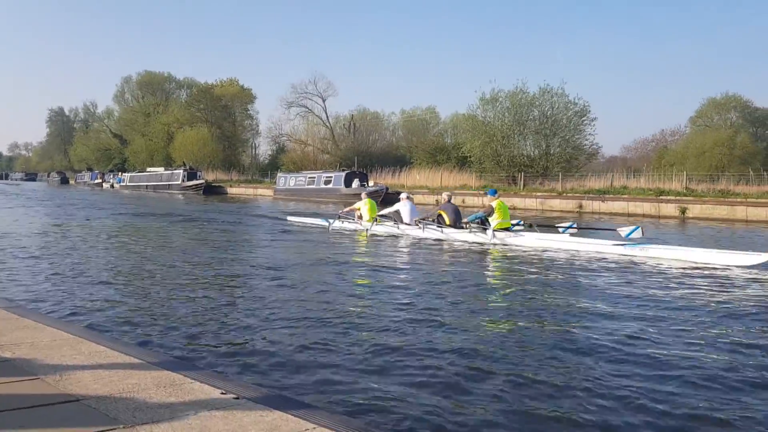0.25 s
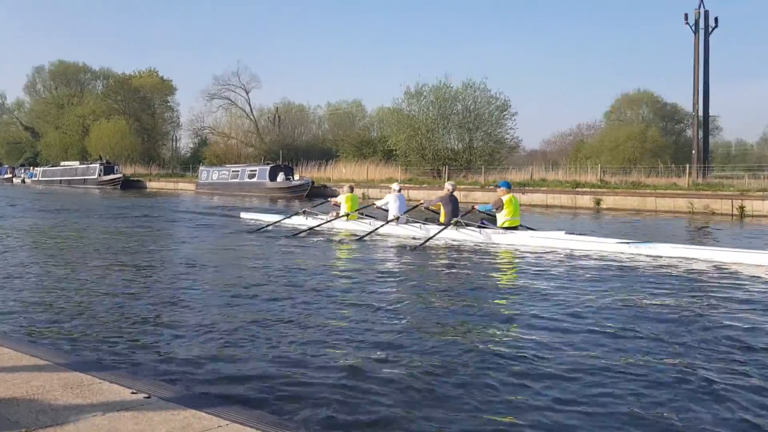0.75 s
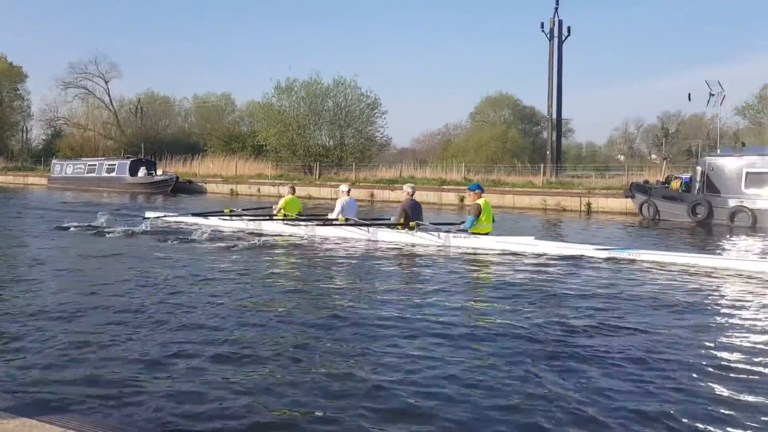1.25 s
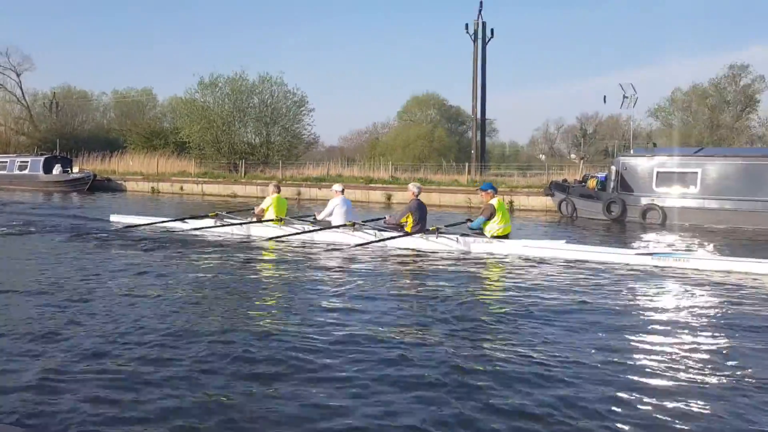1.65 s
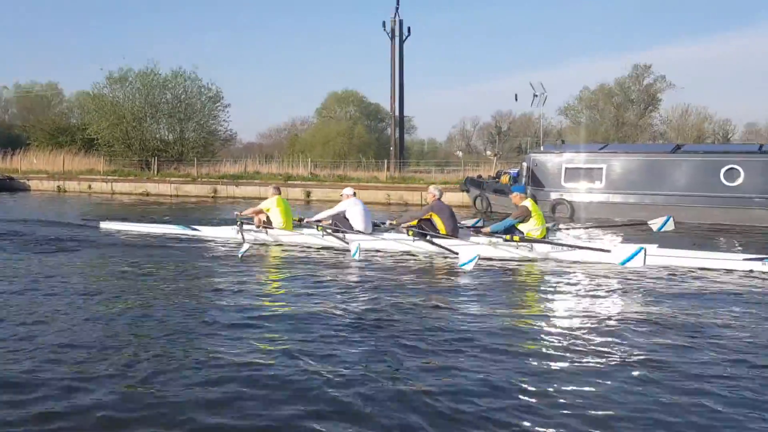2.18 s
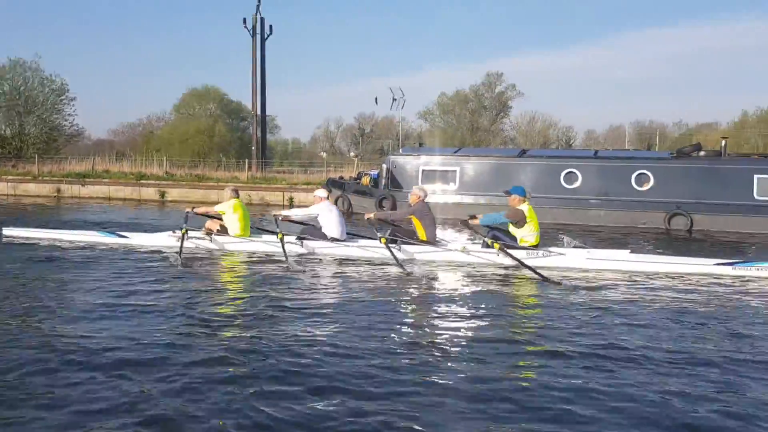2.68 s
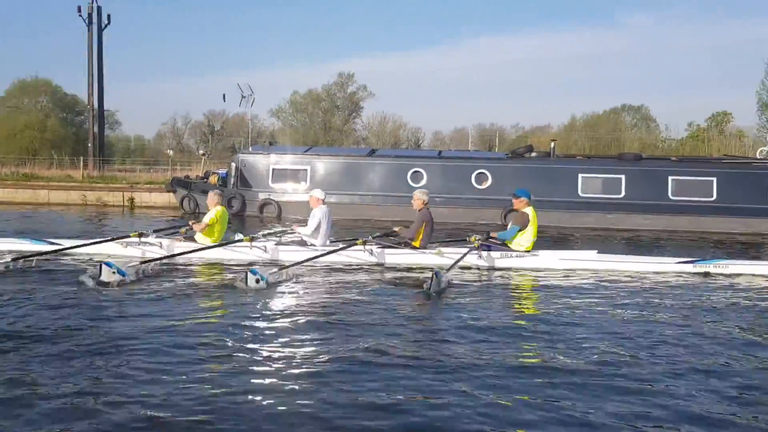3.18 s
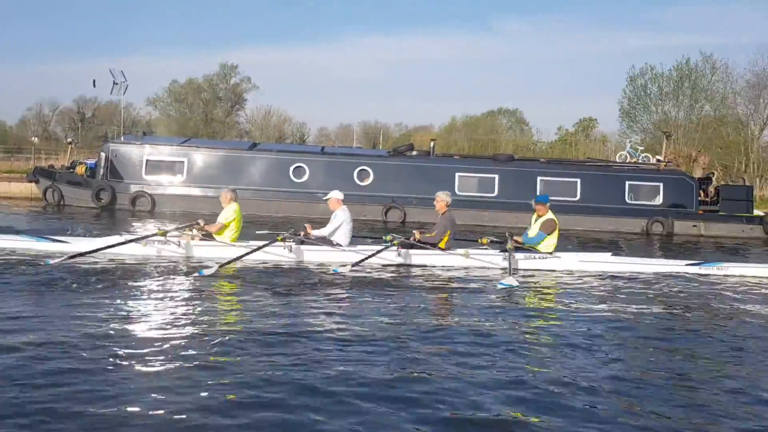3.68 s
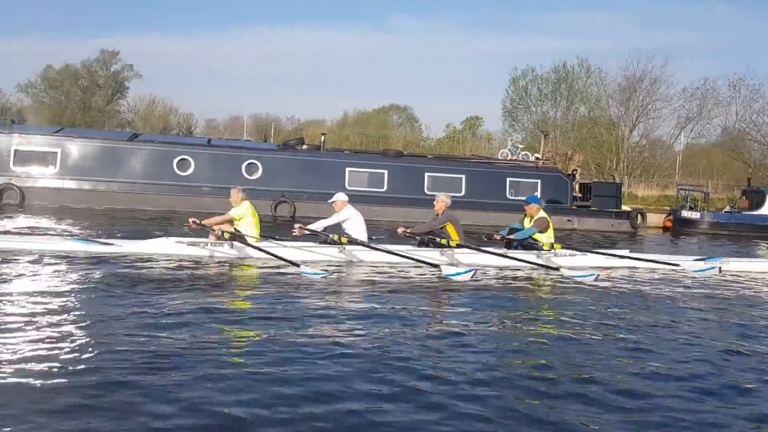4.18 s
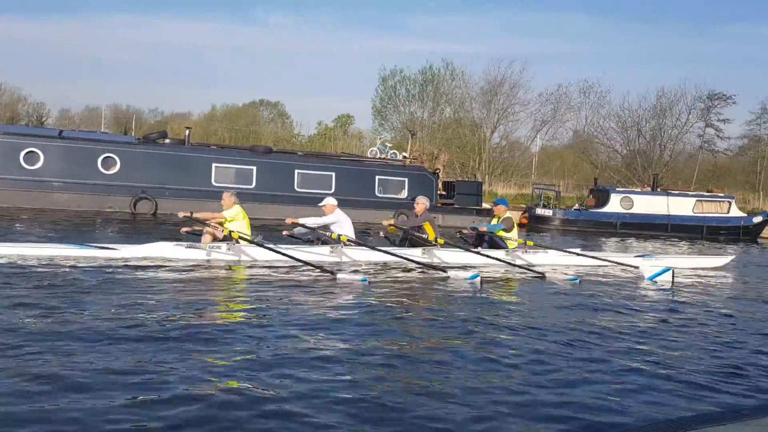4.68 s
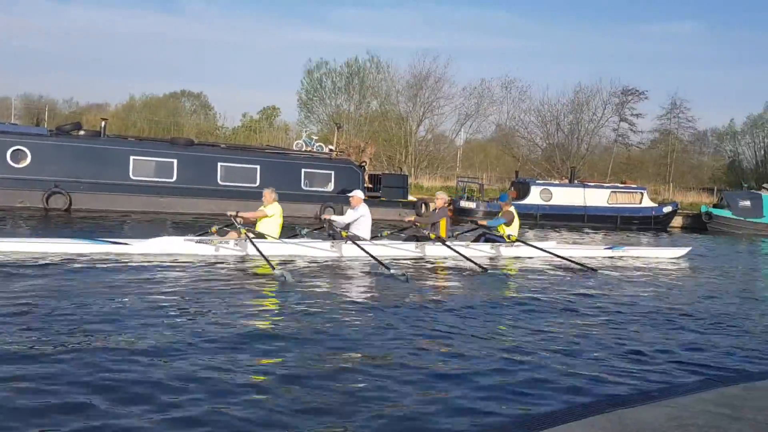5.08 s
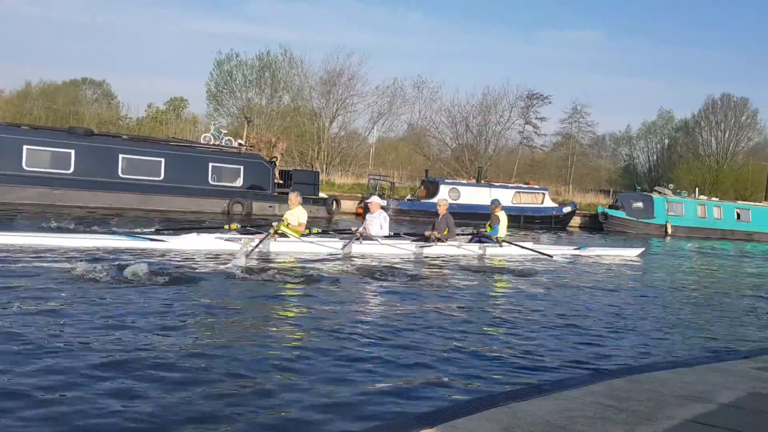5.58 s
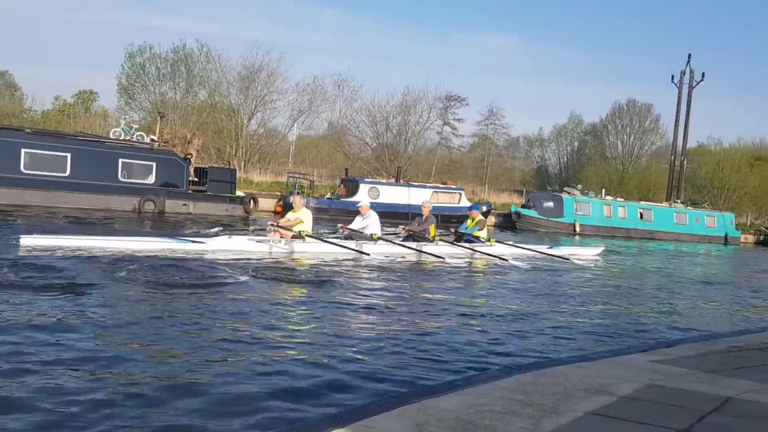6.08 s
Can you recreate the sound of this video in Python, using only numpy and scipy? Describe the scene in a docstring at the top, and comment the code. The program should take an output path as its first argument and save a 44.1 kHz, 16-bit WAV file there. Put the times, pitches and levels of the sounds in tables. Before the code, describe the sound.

Open river bank, soft ripples and rustle, with low breeze buffets on the microphone, strongest around 2.5-3.5 s. A small bird gives thin, high sliding notes from 0 to 2 s, while another whistles faintly far off in the first second. Oars knock lightly at 0.2 s; blades enter with a bubbly splash near 0.45 s, water churns, and a hollow volley of knocks marks the finish around 1.2 s. Wash and ticking drips follow as seats roll forward, with more knocks at 2.3 s. The second catch splashes crisply at 2.55 s, closest and brightest; its finish clunks hard at 3.36 s with a sharp spatter at 3.46 s. Drips and soft knocks lead to the third catch at 4.7 s, then firm knocks and a bright splash at 5.46 s and a swelling wash. Faint chirps return from 5.1 s; last clacks come around 5.9-6.1 s as seats roll again.

```python
"""A four rows past close to a river bank, about one stroke every two seconds, under a breeze and faint ripples and rustle.
Before each stroke the seats roll forward (filtered noise) and oars are squared in volleys of knocks (damped modes).
At the catch the blades drop in with bubbles and spray, then drive, come out at the finish and are feathered with knocks;
a wash (swelling noise) and ticking drips follow. The finest treble is strongest at 2.8 s.
A small bird sings in the trees at the start and near the end, and another whistles far off early on (gliding sines)."""
import sys
import numpy as np
from scipy import signal
from scipy.fft import rfft, irfft, next_fast_len
from scipy.io import wavfile
from scipy.ndimage import uniform_filter1d, map_coordinates

SR = 44100
rng = np.random.default_rng(int(sys.argv[2]) if len(sys.argv) > 2 else 0)


def digitize_waveform(pressure):
    """Quantize a signal to 16-bit integers and store it at the path in sys.argv[1].

    Rows of a 2-D input are taken as channels; values are limited to [-1, 1].
    """
    field = np.atleast_2d(pressure).T
    bounded = np.clip(field, -1, 1)
    quanta = np.round(bounded * 32767).astype(np.int16)
    wavfile.write(sys.argv[1], SR, quanta)


N = 279974
TIME = np.arange(N) / SR  # seconds


def amp(db):
    """Decibel law: a level in dB becomes an amplitude gain."""
    return 10 ** (np.asarray(db) / 20)


def unit(x):
    """Power normalisation: scales a signal to rms 1."""
    return x / np.sqrt(np.mean(x ** 2) + 1e-20)


def curves(rows):
    """Linear interpolation: each column of a time table, sample by sample."""
    s, *columns = np.transpose(rows)
    return [np.interp(TIME, s, column) for column in columns]


def read(points, hz):
    """Logarithmic frequency scale: reads a table between its points as the ear spaces pitch."""
    f, value = np.transpose(points)
    return np.interp(np.log(hz + 1), np.log(f + 1), value)


def add(mix, s, sound):
    """Superposition: mixes a sound in at time s, cut off at the end of the mix."""
    part = mix[..., max(round(s * SR), 0):][..., :sound.shape[-1]]
    part += sound[..., :part.shape[-1]]


def colour(x, spectrum):
    """Spectral shaping: multiplies the spectrum of x by a table of gains, then scales to rms 1."""
    size = next_fast_len(x.shape[-1])
    gain = amp(read(spectrum, np.fft.rfftfreq(size, 1 / SR)))
    shaped = irfft(rfft(x, size) * gain, size)
    return unit(shaped[..., :x.shape[-1]])


# Likeness of a diffuse sound at two close ears. Each row: frequency in Hz, correlation from 0 to 1.
LIKENESS = [(60, 1), (250, 0.84), (600, 0.93), (1200, 0.3), (2500, 0.02), (6000, 0.012), (15000, 0.11)]


def pair(x):
    """Spatial coherence: makes two unrelated signals alike in the bass, as two close ears hear them."""
    size = next_fast_len(N)
    a, b = rfft(x, size)
    same = np.clip(read(LIKENESS, np.fft.rfftfreq(size, 1 / SR)), -1, 1)
    right = same * a + np.sqrt(1 - same ** 2) * b
    return irfft(np.array([a, right]), size)[:, :N]


def wander(per_s):
    """Slow random modulation: joins per_s chance values a second by straight lines, at rms 1."""
    return unit(np.interp(TIME * per_s, np.arange(4000), rng.standard_normal(4000)))


def hiss():
    """White noise: two unrelated signals with equal power at all frequencies."""
    return rng.standard_normal((2, N))


def gurgle(x, depth_db):
    """Time-frequency modulation: small patches of pitch grow louder and softer at random, an uneven texture."""
    z = signal.stft(x, nperseg=512)[2]
    patches = rng.standard_normal(z.shape[1:])
    patches = uniform_filter1d(patches, size=5, axis=0)  # across frequency
    patches = uniform_filter1d(patches, size=4, axis=1)  # across time
    return unit(signal.istft(z * amp(depth_db * unit(patches)), nperseg=512)[1][:, :N])


def swell(peak_s, rise_s, fall_s, edge=1):
    """Exponential envelope: grows to 1 at the peak and dies away; a higher edge flattens the top."""
    distance = np.maximum((peak_s - TIME) / rise_s, (TIME - peak_s) / fall_s)
    return np.exp(-distance ** edge)


def together(gains):
    """Energy addition: the joint gain of unrelated sounds is the root of their summed squares."""
    return np.sqrt(np.sum(np.square(gains), axis=0))


def ring(modes, t, detune=0):
    """Modal decay: damped sines after one blow, each at a chance phase and with chance detuning."""
    out = 0
    for hz, db, t60 in modes:
        mode_hz = hz * (1 + detune * rng.standard_normal())
        out = out + amp(db - 60 * t / t60) * np.sin(2 * np.pi * mode_hz * t + rng.random())
    return out


# Ripples and rustle all around. Each row: frequency in Hz, relative level in dB per Hz.
AIR = [(18, -42), (30, -23), (121, -9), (364, -3.5), (540, -3.5), (760, -24), (1130, -30), (1320, -19),
       (2060, -11), (3400, -19), (6380, -21.5), (9710, -25.5), (13000, -22), (16000, -27)]


def air():
    """Diffuse background: coloured noise of equal power on both sides, flickering in small patches of pitch."""
    return amp(-50.5) * colour(gurgle(pair(hiss()), depth_db=4.5), AIR)


# Spectrum of the wind turbulence. Each row: frequency in Hz, relative level in dB per Hz.
WIND = [(15, -45), (35, -16), (62, -3), (85, -7), (125, -6), (180, -15), (300, -22), (700, -41),
        (3000, -62)]
# Strength of the breeze. Each row: time in seconds, relative level in dB, left minus right in dB.
BREEZE = [(0.0, -54.5, -27), (0.45, -35.5, 10), (1.35, -37.5, -0.5), (2.1, -41.5, 2), (2.48, -35, 3),
          (2.62, -26.5, 1.5), (2.85, -46.5, 30.5), (3.43, -22.5, -3.5), (3.66, -50, 28.5), (3.87, -38.5, 8),
          (4.3, -34.5, 4), (4.8, -48, 12), (5.3, -56, 24), (5.55, -35.5, 1), (6.35, -54, 24)]
# Single buffets of wind. Each row: start in seconds, relative level in dB, frequency in Hz.
BUFFETS = [(0.353, -22.5, 67), (2.545, -19, 176), (2.677, -24, 101), (3.091, -21.5, 87), (3.374, -16, 133),
           (3.419, -30, 68), (3.817, -21, 83.7), (3.854, -24, 48.1), (3.881, -22, 56.6), (3.921, -25, 70.4),
           (4.149, -17.5, 125), (4.305, -19, 64.7), (5.598, -28, 107)]


def breeze(level_db=-2, lump_db=2.5, buffet_db=-4, buffet_s=0.0058):
    """Turbulent pressure on the microphone: lumpy low noise, partly unrelated at each port, and single buffets."""
    level, side = curves(BREEZE)
    lumps = amp(lump_db * np.array([wander(25), wander(25)]))
    eddies = colour(hiss() + 1.06 * rng.standard_normal(N), WIND) * lumps
    out = unit(eddies) * amp(level + level_db + np.array([side, -side]) / 2)
    t = TIME[:SR // 10]
    for s, db, hz in BUFFETS:
        push = t / buffet_s * np.exp(1 - t / buffet_s) * np.sin(2 * np.pi * hz * t)
        add(out, s, amp(db + buffet_db) * push * np.array([[1.15], [.8]]))  # stronger on the left
    return out


# Shapes of the birds' notes. Each row: time into the note in seconds, pitch in Hz before waver,
# relative level in dB.
SLUR = [(0, 6780, -5), (.012, 6620, -2), (.04, 6200, -3), (.072, 6030, 0), (.098, 5830, -1),
        (.116, 5330, -10)]
ARCH = [(0, 6500, -9), (.01, 7450, -3), (.024, 7920, -2), (.046, 7980, -1), (.068, 7680, 0),
        (.085, 7100, -6)]
FLICK = [(0, 6700, -14), (.02, 6520, -6), (.04, 6180, 0), (.052, 5950, -10)]
WHISTLE = [(0, 2400, -12), (.015, 2440, -1), (.045, 2420, 0), (.065, 2280, -2), (.085, 2170, -9)]
LOW_SLUR = [(0, 6600, -20), (.022, 6300, -13), (.042, 6110, -3), (.066, 6000, 1), (.086, 5910, 1),
            (.1, 5700, -4), (.117, 5220, -15)]
LOW_WHISTLE = [(0, 2200, -7), (.02, 2280, 0), (.045, 2330, 0), (.06, 2300, -8)]
RISE = [(0, 4550, -8), (.025, 4900, 0), (.05, 5300, -8)]
LOW_CALL = [(0, 2050, -8), (.02, 2200, 0), (.045, 2430, -6)]
HIGH_CALL = [(0, 2300, -6), (.02, 2520, 0), (.05, 2880, -6)]
HELD_WHISTLE = [(0, 2100, -8), (.015, 2100, 0), (.06, 2090, -1), (.13, 2180, -7)]
# Bird notes. Each row: start in seconds, relative level in dB, fade over the note in dB, shape.
NOTES = [(0.043, -37, 23, SLUR), (0.24, -45.5, 9, SLUR), (0.447, -39, 3, ARCH), (0.636, -50, -7, ARCH),
         (1.153, -42.5, -6, FLICK), (1.307, -35, -2, LOW_SLUR), (1.497, -35.5, -4, LOW_SLUR),
         (1.711, -46.5, -1, ARCH), (1.895, -42.5, 7, ARCH), (5.092, -50.5, 10, SLUR),
         (5.293, -49.5, -13, ARCH), (5.476, -55, -13, ARCH), (5.955, -40, 12, FLICK),
         (6.098, -47.5, -5, SLUR), (6.292, -56.5, -12, SLUR), (.04, -52, 2, LOW_WHISTLE),
         (0.392, -49, -8, WHISTLE), (.698, -43.5, 12, HELD_WHISTLE), (.8, -48, 2, RISE),
         (.91, -48, -1, RISE), (0.0, -54, 7, HIGH_CALL), (.335, -52, 0, HIGH_CALL),
         (.505, -52, 2, HIGH_CALL), (.795, -41, 7, LOW_CALL)]


def birds(level_db=-2, twinkle_db=3.5, waver=0.0046, echo_s=.107, echo_db=-21):
    """Frequency modulation: thin sines glide through each note's shape, with an echo from the far bank."""
    song, tremble = np.zeros(N), 1 + waver * wander(460)
    for s, db, fade_db, shape in NOTES:
        age, hz, level = np.transpose(shape)
        t = np.arange(0, age[-1], 1 / SR)
        pitch = np.interp(t, age, hz) * np.roll(tremble, -round(s * SR))[:len(t)]
        gain = amp(db + level_db + np.interp(t, age, level) - fade_db * t / age[-1])
        gain = gain * signal.windows.tukey(len(t), .1)  # soft ends
        add(song, s, gain * np.sin(2 * np.pi * np.cumsum(pitch) / SR))
    add(song, echo_s, amp(echo_db) * song)
    return song * amp(twinkle_db * np.array([wander(45), wander(38)]))  # moving air makes the level twinkle


def banks(x, t60=0.3, first_s=0.011):
    """Reverberation: sparse decaying reflections from moored boats and the banks, by convolution."""
    t = TIME[:SR // 2]
    sparse = rng.random((2, len(t))) < .05
    taps = rng.standard_normal((2, len(t))) * sparse * amp(-60 * t / t60) * (t > first_s)
    return pair(signal.fftconvolve(x, taps / np.linalg.norm(taps[0]), axes=1)[:, :N])


# Strokes. Each row: catch in seconds, finish in seconds, churn of the catch in dB, of the drive in dB,
# of the wash in dB, time to settle in seconds, spray over churn in dB, relative level of the seats in dB.
STROKES = [(0.454, 1.198, -43.5, -40, -42.5, 0.5, -5.5, -39),
           (2.547, 3.389, -42, -33.5, -44, 0.29, -7.5, -40), (4.686, 5.503, -43, -43, -38.5, 0.35, -9, -39)]
STROKE_S = 2.215  # from the last catch to the next
SLIDE_EDGE = 1.76  # how squarely the slide starts and stops


def sliding(lead_s=0.44, rise_s=0.41, fall_s=0.2):
    """Periodic motion: the crew's slide is fastest shortly before each catch, the next one included."""
    catches = [stroke[0] for stroke in STROKES]
    catches.append(catches[-1] + STROKE_S)
    return together([swell(s - lead_s, rise_s, fall_s, SLIDE_EDGE) for s in catches])


def sweep(x, share=1, linger_s=0.429, swing_s=0.34):
    """Interaural time difference: sound from astern reaches the right ear later; share scales the delay."""
    ahead_ms, astern_ms = 0.012, 0.25  # lead of the left ear at share 1
    path = []
    for catch_s, finish_s, *_ in STROKES:
        path += [(catch_s, ahead_ms), (finish_s, astern_ms)]
        path += [(finish_s + linger_s, astern_ms), (finish_s + linger_s + swing_s, ahead_ms)]
    lead_ms, = curves(path)
    late = np.arange(N) - share * lead_ms * SR / 1000
    return np.array([x[0], map_coordinates(x[1], [late], order=3)])


def passing(x, nearest_s=2.8, near_for_s=0.22, above_hz=9500):
    """Distance cue: the finest treble is strongest while the boat is nearest."""
    high_pass = signal.butter(2, above_hz, "high", fs=SR, output="sos")
    return x + swell(nearest_s, near_for_s, near_for_s) * signal.sosfiltfilt(high_pass, x)


def rolling():
    """Energy envelope of the seats: slide, push-off after the catch, roll back, stop at the finish and settle."""
    slide_db, drive_db, drive_edge, stop_db = -44, -43, 4, 2.0
    push_lag_s, push_rise_s, push_fall_s = 0.1, 0.15, 0.14
    stop_rise_s, stop_share = 0.1, 0.73  # share of the settling time
    gains = [amp(slide_db) * sliding()]
    for catch_s, finish_s, *_, settle_s, _, seat_db in STROKES:
        half_s = (finish_s - catch_s) / 2
        gains.append(amp(seat_db) * swell(catch_s + push_lag_s, push_rise_s, push_fall_s))
        gains.append(amp(drive_db) * swell(catch_s + half_s, half_s, half_s, drive_edge))
        gains.append(amp(seat_db + stop_db) * swell(finish_s, stop_rise_s, stop_share * settle_s))
    return together(gains)


# Hum of the wheels on each slide towards the catch. Each row: time of the peak in seconds, level in dB.
SLIDES = [(0.0, -47), (2.1, -36.5), (4.13, -41.5), (6.33, -41.5)]
# Seat rumble through the hull. Each row: frequency in Hz, relative level in dB per Hz.
ROLL = [(70, -6), (130, -8), (200, -1.5), (290, 4), (380, -6), (470, 7), (540, 5), (620, 1), (790, -9.5),
        (1500, -30), (4000, -70)]
# Seat wheels on their rails. Each row: frequency in Hz, relative level in dB per Hz.
WHEELS = [(100, -16), (300, -8), (400, -10), (500, -3.5), (610, -1), (760, -17), (1500, -20), (4000, -69)]


def seats(judder_db=2.0, hum_rise_s=0.19, hum_fall_s=0.2):
    """Rolling noise: seat wheels hum and judder along the slides and rumble through the hull."""
    hum = together([amp(db) * swell(s, hum_rise_s, hum_fall_s, SLIDE_EDGE) for s, db in SLIDES])
    rumble = rolling() * colour(pair(hiss()), ROLL)
    return amp(judder_db * wander(40)) * (rumble + hum * colour(pair(hiss()), WHEELS))


def bubbles(low_hz, high_hz, per_s, cycles, spread_db, count=20):
    """Bubble resonance: sparse short pings, rising in pitch, of very uneven size, in a different phase at each ear."""
    out = np.zeros((2, N))
    for hz in np.geomspace(low_hz, high_hz, count):
        age = np.arange(int(6 * cycles * SR / hz)) * hz / SR / cycles  # in decay times
        phase = rng.normal(0, 1.0, (2, 1))
        envelope = np.exp(-age) * (1 - np.exp(-8 * age))
        ping = envelope * np.sin(2 * np.pi * cycles * age * (1 + 0.011 * age) + phase) * np.sqrt(hz)
        where = rng.integers(0, N, round(per_s / count * N / SR))
        size = amp(spread_db * np.minimum(rng.exponential(1, len(where)), 3.5))
        places = (where[:, None] + np.arange(len(age))).ravel()
        out += [np.bincount(places, np.outer(size, p).ravel(), minlength=N)[:N] for p in ping]
    return unit(out)


def stirring():
    """Energy envelopes of churn and spray: the hull runs, then the blades catch, drive and leave their wash."""
    run_db, run_spray_db, drive_spray_db, wash_spray_db = -47.0, -56, -4.5, 3
    catch_lag_s, catch_rise_s, catch_fall_s = 0.062, 0.095, 0.68
    drive_lead_s, drive_rise_s, drive_fall_s = 0.13, 0.18, 0.15  # lead before the finish
    wash_lag_s, wash_rise_s = 0.13, 0.24  # lag behind the finish
    run = sliding()
    churn, spray = [amp(run_db) * run], [amp(run_spray_db) * run]
    for catch_s, finish_s, catch_db, drive_db, wash_db, settle_s, spray_db, _ in STROKES:
        catch = amp(catch_db) * swell(catch_s + catch_lag_s, catch_rise_s, catch_fall_s)
        drive = amp(drive_db) * swell(finish_s - drive_lead_s, drive_rise_s, drive_fall_s)
        wash = amp(wash_db) * swell(finish_s + wash_lag_s, wash_rise_s, settle_s)
        churn += [catch, drive, wash]
        thrown = together([catch, amp(drive_spray_db) * drive, amp(wash_spray_db) * wash])
        spray.append(amp(spray_db) * thrown)
    return together(churn), together(spray)


# Blades slapping into and out of the water. Each row: start in seconds, relative level of the spray in dB,
# relative level of the slap in dB, decay in seconds.
SPLASHES = [(0.441, -45, -41, 0.049), (0.568, -28.5, -34, 0.015), (0.959, -39, -37.5, 0.078),
            (2.546, -29.5, -32.5, 0.023), (2.57, -25, -28.5, 0.01), (2.611, -59, -39, 0.0087),
            (2.669, -52, -32, 0.0093), (3.462, -19, -46, 0.01), (3.505, -33, -37, 0.026),
            (4.689, -29.5, -33.5, 0.021), (4.781, -34, -38, 0.021), (4.839, -41, -38, 0.013),
            (5.13, -80, -42, 0.095), (5.451, -27, -36.5, 0.023), (5.604, -47, -37, 0.014),
            (5.63, -40, -70, 0.056), (5.677, -33, -36, 0.013)]
# Churned water. Each row: frequency in Hz, relative level in dB per Hz.
CHURN = [(300, -12), (600, 4.5), (800, -3.5), (1050, 3.5), (1350, -1.5), (1700, 0.5), (2200, 2),
         (2400, -14), (3300, -13), (4100, -17), (6000, -8.5), (14000, -49)]
# Spray and drops. Each row: frequency in Hz, relative level in dB per Hz.
SPRAY = [(1200, -14), (2400, 4), (3300, 1.5), (4100, 6), (5200, -1), (6700, 5.5), (8500, 0), (10200, -1.5),
         (12500, 2), (14500, -5.5), (16000, -7)]


def water(crackle_db=-4, lap_db=1.74, burst_db=-8, rise_s=0.004, plink_db=-13):
    """Entrained air: blades churn up bubbles and throw spray; entries and exits add sudden bursts of both."""
    churning, spraying = stirring()
    churn_gain = churning * amp(lap_db * wander(60))
    spray_gain = spraying * amp(lap_db * wander(90))
    t = TIME[:SR // 4]
    for s, high_db, low_db, decay_s in SPLASHES:
        burst = (1 - np.exp(-t / rise_s)) * np.exp(-t / max(decay_s, .002))
        add(churn_gain, s, amp(low_db) * burst)
        add(spray_gain, s, amp(high_db + burst_db) * burst)
    churn = unit(pair(hiss())) + amp(-2) * bubbles(600, 3500, 2000, 3.5, 3.2)
    drops = amp(-3) * bubbles(2500, 14500, 1600, 7, 3.5)
    crackle = amp(crackle_db) * bubbles(5100, 17000, 350, 0.11, 3.6, count=10)  # drops bursting on the surface
    spray = unit(pair(hiss())) + drops + crackle
    churn, spray = gurgle(churn, depth_db=2.3), gurgle(spray, depth_db=3)
    plinks = amp(plink_db) * bubbles(2370, 5110, 450, 13, 1.17, count=24)  # larger drops trapping air
    return (colour(churn, CHURN) + plinks) * churn_gain + colour(spray, SPRAY) * spray_gain


# Flung water landing as clusters of drops. Each row: start in seconds, length in seconds,
# relative level of the first drops in dB, fade over the cluster in dB.
SPATTERS = [(0.567, .016, -31, 6), (2.073, 0.052, -39, 1), (2.566, .03, -28.5, 11), (1.021, 0.17, -39, 0),
            (3.13, .12, -43, 5.5), (3.4625, .004, -15.5, 2), (3.471, .016, -31, 5), (3.507, 0.016, -23, 4),
            (3.531, .045, -33.5, 5), (4.221, 0.14, -43, 4), (4.771, 0.045, -43, 10)]


def spatters(level_db=-4, drops_per_s=450, spread_db=1.5, drop_s=0.00039):
    """Impulse trains: flung water breaks up and lands as a ragged run of noise ticks, added by energy."""
    energy, t = np.zeros(N), TIME[:SR // 50]
    tick = t / drop_s * np.exp(1 - t / drop_s)
    for s, length_s, db, fade_db in SPATTERS:
        place, size = rng.random(200), rng.standard_normal(200)
        count = int(np.clip(length_s * drops_per_s + 1, 2, 200))
        for k in range(count):
            turn = (k + place[k] * (k > 0)) / count  # position in the cluster, 0 to 1
            drop_db = db + level_db - fade_db * turn + spread_db * np.clip(size[k], -2, 1)
            add(energy, s + turn * length_s, (amp(drop_db) * tick) ** 2)
    return np.sqrt(energy) * colour(gurgle(pair(hiss()), depth_db=4.5), SPRAY)


def small_drips(count=6):
    """Random shedding: drops fall while the blades swing forward; gives time in seconds and relative dB."""
    drips = []
    for _, finish_s, *_ in STROKES:
        for _ in range(count):
            drips.append((finish_s + rng.uniform(0.54, 1.1), -29.5 + 1.5 * rng.standard_normal()))
    return drips


# Sharp clacks of collars and riggers, and one bright splash near 5.46 s. Each row: start in seconds,
# relative level of the scuff in dB, of the ring in dB, pitch of the ring in Hz, relative treble in dB,
# time to full contact in seconds.
CLACKS = [(0.158, -38, -40, 960, -53, 0.0058), (0.641, -37, -32.5, 1820, -36.5, 0.0062),
          (1.288, -35, -23, 960, -32.5, .004), (1.381, -38, -31, 1370, -57, 0.0034),
          (1.433, -26, -29.5, 985, -41, 0.0016), (1.66, -36.5, -41, 1940, -38, 0.0051),
          (1.724, -32.5, -31, 1552, -33, 0.0046), (2.012, -58, -46, 890, -57, 0.0014),
          (2.202, -34, -33, 1770, -44, 0.0056), (2.28, -35, -30, 990, -52, 0.0018),
          (2.55, -31.5, -35, 2180, -44, 0.006), (2.662, -39, -36, 1040, -50, 0.0013),
          (2.732, -41, -38.5, 1640, -64, 0.0036), (2.983, -38, -44, 910, -50, .0015),
          (3.357, -42, -32, 3900, -33, 0.0028), (3.971, -42, -34, 915, -54, 0.0061),
          (4.034, -37.5, -36, 1870, -41, .004), (4.073, -38, -34, 2080, -37, 0.0035),
          (4.31, -36.5, -55, 2060, -45, 0.0055), (4.545, -52, -34, 2050, -56, .004),
          (4.695, -36, -28, 1150, -37, 0.0028), (4.988, -41, -47, 1010, -56, 0.0016),
          (5.463, -37, -33, 4300, -36, 0.0036), (5.885, -33, -30.5, 1140, -51, 0.0049),
          (6.085, -25.5, -25.5, 1000, -34.5, 0.004), (6.119, -31.5, -29, 4160, -32.5, 0.0043)]
# The largest drops. Each row: start in seconds, relative level in dB.
DRIPS = [(0.063, -28.5), (1.178, -24), (1.337, -26), (1.7944, -25.5), (2.1994, -17.5), (2.465, -25),
         (3.16, -25.5), (3.617, -30), (4.05, -18), (4.235, -31), (4.273, -32), (4.5673, -27.5)]
# Body of the scuff. Each row: frequency in Hz, relative level in dB per Hz.
CLACK_BODY = [(300, 6.5), (700, 8), (1000, 4), (1300, -10), (1550, 8), (2050, 4.5), (2500, 0), (3300, -14),
              (4200, -13), (5000, -16), (8000, -17), (14000, -36)]
# Treble of the clacks, mostly grit under a collar. Each row: frequency in Hz, relative level in dB per Hz.
GRIT = [(1800, -6), (3500, 3.5), (7500, 3), (9500, -6.5), (15000, -6)]


def clacks(ring_db=1, ring_t60=0.027, ring_rise_s=0.0017, treble_gain_db=1, drip_db=-7, drip_decay_s=0.0029):
    """Impact: collars scuff home, each ringing a part of its rigger; one bright splash is made alike; drops tick."""
    scuffs, rings, grit, ticks = np.zeros((4, N))
    t = TIME[:SR // 10]
    for s, scuff_db, part_db, hz, treble_db, contact_s in CLACKS:
        contact = t / contact_s * np.exp((1 - (t / contact_s) ** 2) / 2)
        add(scuffs, s, amp(scuff_db) * contact)
        part = ring([(hz, part_db + ring_db, ring_t60)], t)
        add(rings, s, 2 * (1 - np.exp(-t / ring_rise_s)) * part)
        add(grit, s, amp(treble_db + treble_gain_db) * contact)
    for s, db in DRIPS + small_drips():
        add(ticks, s, amp(db + drip_db) * np.exp(-t / drip_decay_s))
    noise = gurgle(pair(hiss()), depth_db=4)
    body = colour(rng.standard_normal(N) + 1.95 * hiss(), CLACK_BODY)
    return rings + scuffs * body + grit * colour(noise, GRIT) + ticks * colour(noise, SPRAY)


# Volleys of oars turning in their gates. Each row: start in seconds, count of blows, length in seconds,
# relative ring of gate and shaft in dB, its fade over the volley in dB, relative boom of the hull in dB,
# pitch of the shaft in Hz at the first blow, before detuning.
KNOCKS = [(0.163, 2, 0.02, -26, -1, -22, 475), (0.206, 4, 0.039, -22, 16, -22.5, 488),
          (0.989, 2, 0.015, -20, 7, -43, 516), (1.042, 3, 0.08, -32.5, -6, -25.5, 546),
          (1.187, 6, 0.14, -14, 20, -22, 538), (1.579, 2, 0.031, -24, 3.5, -26, 530),
          (2.014, 1, 0, -26.5, 0, -41, 585), (2.279, 1, 0.039, -18.5, 3, -25.5, 594),
          (2.298, 6, 0.088, -18.5, 6.5, -23, 549.4), (2.661, 1, 0.059, -19, 0, -35, 607),
          (2.983, 1, 0, -24, 0, -58, 559), (3.173, 4, 0.093, -29, -5, -31.5, 556),
          (3.356, 1, 0.017, -11.5, 0, -21.5, 520), (3.376, 5, 0.085, -12.5, 14, -24, 518),
          (4.414, 5, 0.076, -22, 8.5, -21, 490), (4.988, 1, 0.066, -24.5, 21, -39, 527),
          (5.467, 1, 0.06, -11.5, -2, -27, 516), (5.488, 4, 0.11, -21.5, 1, -26.5, 530),
          (5.896, 1, 0, -22.5, 0, -30, 517), (6.087, 1, 0.027, -27, 0, -48, 520)]


def blows(straggle=1.25, boom_fade_db=3.5, jitter_s=0.00204, pitch_sag=.035):
    """Impact sequence: late oars straggle further apart and sink in pitch; gives seconds, ring and boom dB, Hz."""
    for s, count, length_s, ring_db, fade_db, boom_db, hz in KNOCKS:
        for turn in np.linspace(0, 1, round(count)):
            late = length_s * turn ** straggle + jitter_s * rng.standard_normal() * (turn > 0)
            yield s + late, ring_db - fade_db * turn, boom_db - boom_fade_db * turn, hz * (1 - pitch_sag * turn)


# Gate and shaft. Each row: frequency in Hz before scaling to the shaft's pitch, relative level in dB,
# t60 in seconds for a firm blow, before that scaling.
GATE_MODES = [(525.5, -3, 0.11), (459, -9, 0.083), (583, -2, 0.02), (1033, -25, 0.077), (1197, -26, 0.13),
              (1658, -21.5, 0.075), (1960, -51, 0.065)]
# Hollow hull. Each row: mean frequency in Hz, relative level in dB, t60 in seconds.
HULL_MODES = [(137.6, 0, 0.086), (193.4, -2, 0.16), (243, 1, 0.058), (285.6, -8, 0.14), (337, -20, 0.034)]
# Loose parts shaken by a knock. Each row: frequency in Hz, relative level in dB per Hz.
RATTLE = [(100, -11), (250, 16), (600, 7), (900, -1), (2000, -9), (3000, -21), (5000, -21), (12000, -73)]


def knocks():
    """Impact excitation of modes: oars turn and drop in their gates; shaft rings, hull booms, parts rattle."""
    gate_db, hull_db, rattle_db, turn_db = 2, 4, -8, -12
    give_s, rattle_decay_s, turn_rise_s, turn_fall_s = 0.0058, 0.01, 0.058, 0.071
    firm_db, damping = -19, 9  # ring level of a firm blow; decay rate per second for each dB below it
    gates, hull, shake = np.zeros((3, N))
    t = TIME[:SR // 4]
    contact = 1 - np.exp(-t / give_s)
    for s, ring_db, boom_db, hz in blows():
        soft = np.clip(firm_db - ring_db, 0, 10)  # soft blows stay in contact: dead, and less true in pitch
        shaft = ring(GATE_MODES, t * hz / GATE_MODES[0][0], detune=0.015 + 0.0072 * soft)
        add(gates, s, amp(ring_db + gate_db) * contact * shaft * np.exp(-damping * soft * t))
        add(hull, s, amp(boom_db + hull_db) * contact * ring(HULL_MODES, t, detune=0.096) / 2)
        rattle = contact * np.exp(-t / rattle_decay_s)
        add(shake, s, amp((ring_db + boom_db) / 2 + rattle_db) * rattle)
    turning = together([amp(boom_db + turn_db) * swell(s + length_s / 2, turn_rise_s, turn_fall_s)
                        for s, _, length_s, _, _, boom_db, _ in KNOCKS])
    noise = colour(gurgle(pair(hiss()), depth_db=4), RATTLE)
    return gates + hull + together([shake, turning]) * noise


def scene():
    """Superposition of the distant air, the breeze, the birds and the boat, with their reflections."""
    song, thuds, clicks = birds(), knocks(), clacks() + spatters()
    blades = sweep(passing(clicks + water()))
    hull = sweep(thuds + seats(), share=0.57)  # the hull swings less far than the blades
    reflections = amp(-8.5) * banks(thuds + clicks) + amp(-13.5) * banks(song, t60=0.87)
    return air() + breeze() + song + reflections + blades + hull


def record(dry):
    """Band limitation: a linear-phase low-pass filter at 15950 Hz."""
    low_pass = signal.firwin(511, 15950, window=("kaiser", 9), fs=SR)
    return signal.oaconvolve(dry, low_pass[None], "same")


dry = scene()
out = record(dry)
digitize_waveform(out)
```